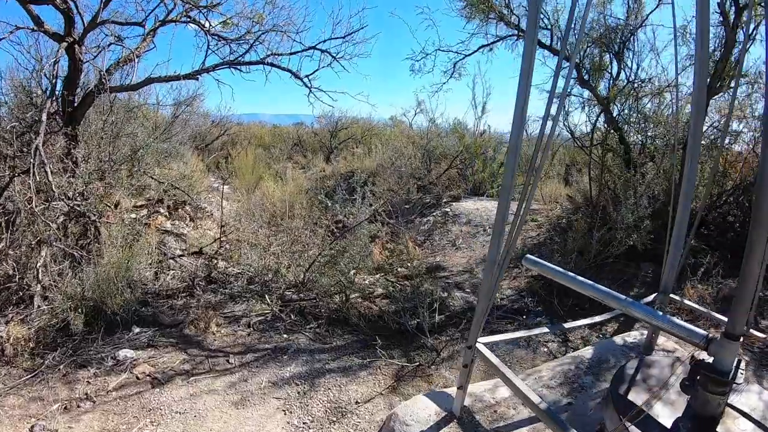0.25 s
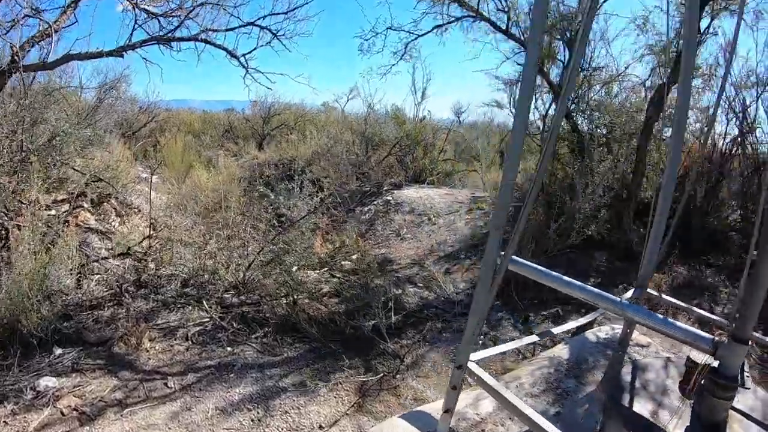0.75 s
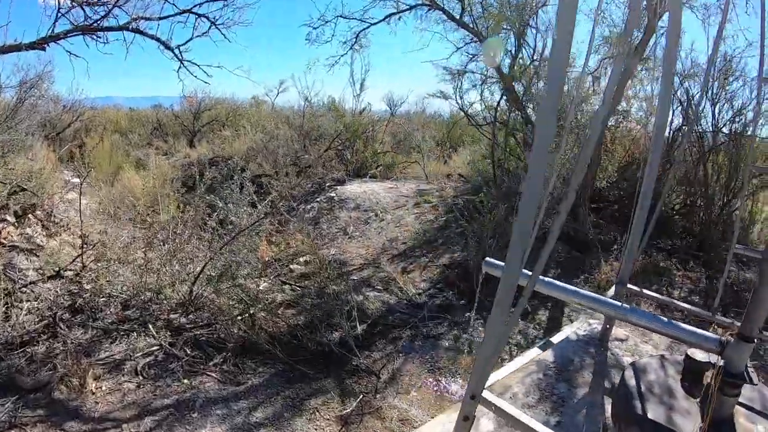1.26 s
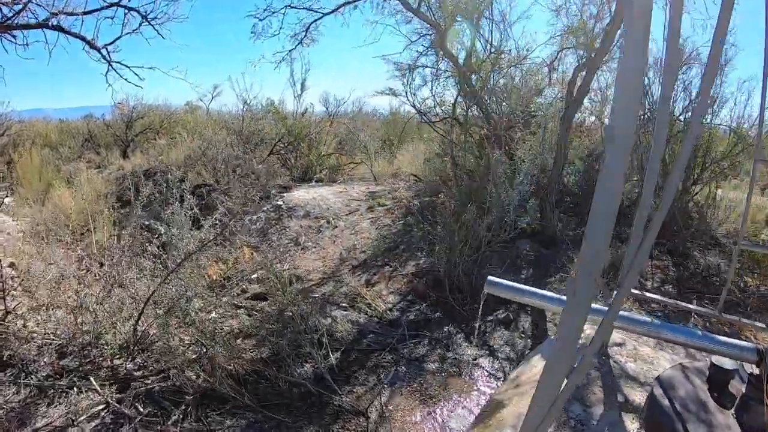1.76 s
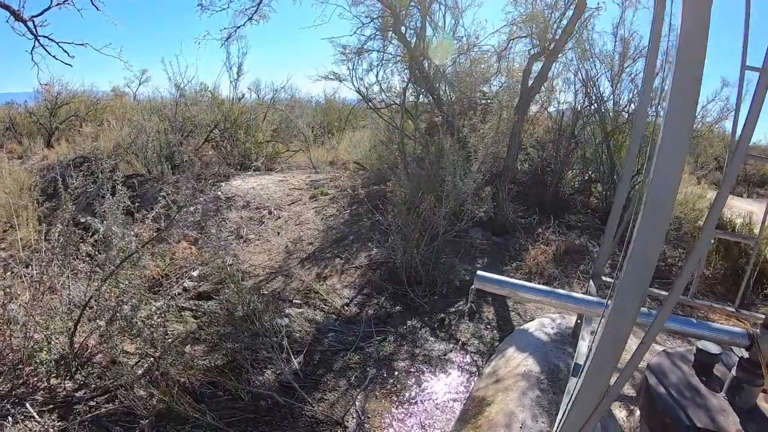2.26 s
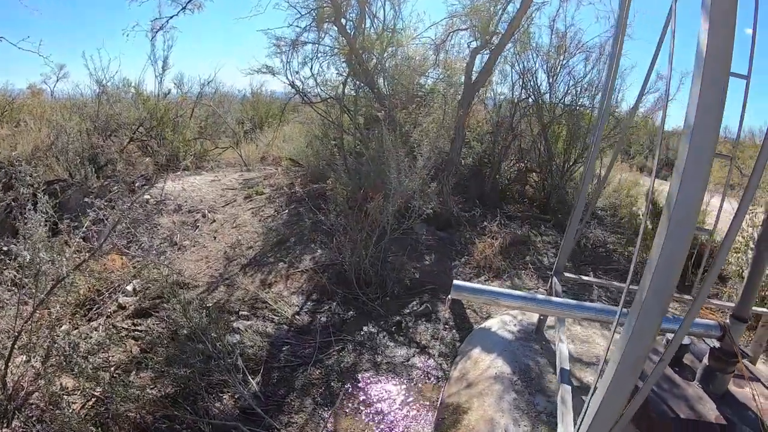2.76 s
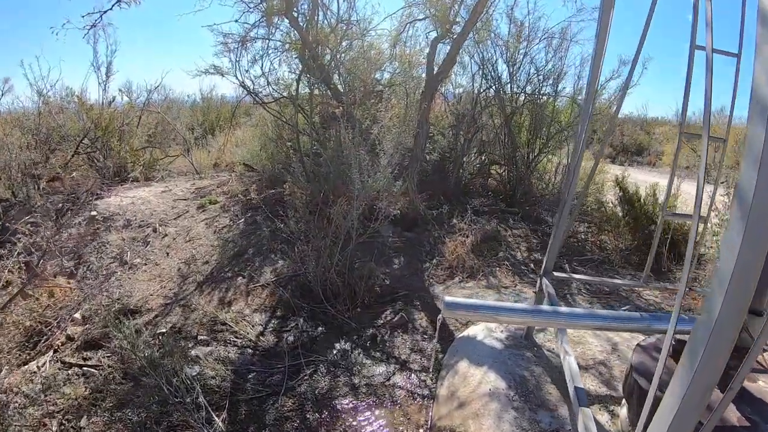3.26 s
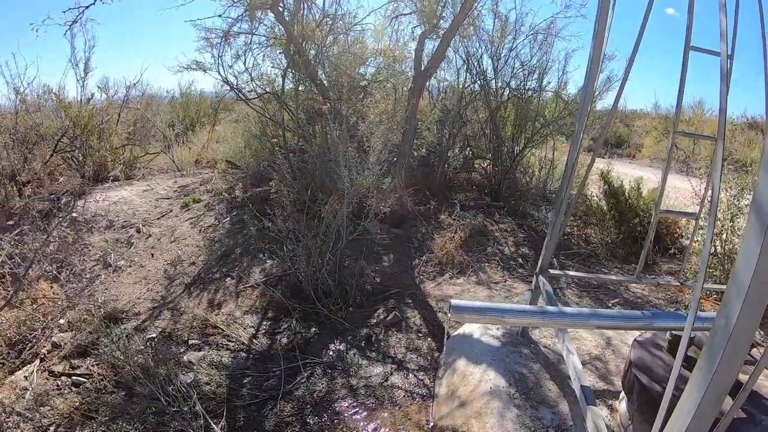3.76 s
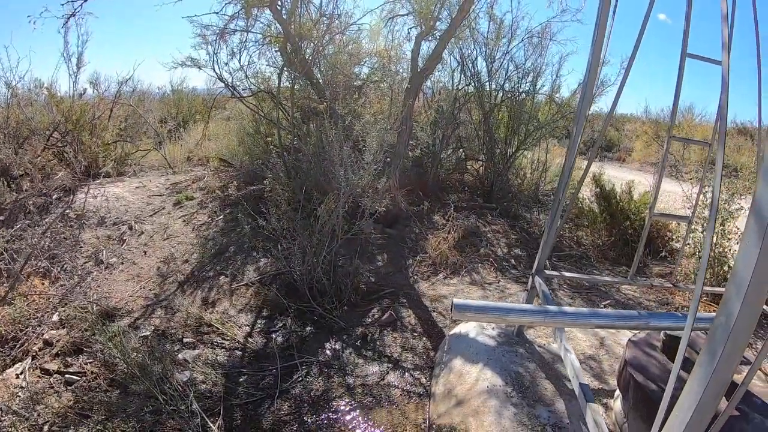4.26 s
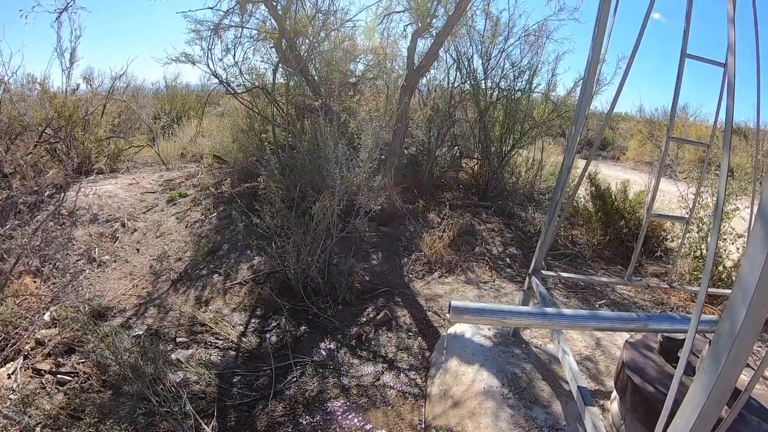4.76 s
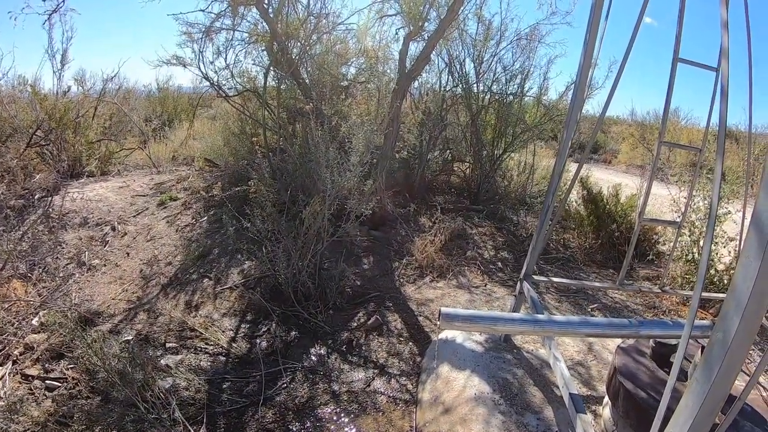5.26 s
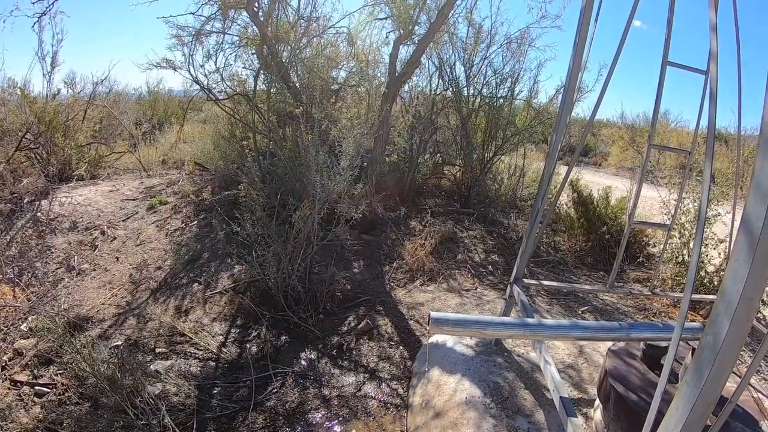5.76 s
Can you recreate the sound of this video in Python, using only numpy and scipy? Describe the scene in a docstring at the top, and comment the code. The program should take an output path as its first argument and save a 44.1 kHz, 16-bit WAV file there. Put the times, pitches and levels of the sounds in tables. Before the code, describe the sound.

At the very start a shoe scuffs briefly on gravel to the right, with a few pebble clicks, and at about 0.4 seconds there is a light knock on the hand-held microphone. At 0.6 seconds water begins to pour from a steel pump pipe, close by and slightly right. It spatters brightly on wet ground, with slapping drops, gurgles and small plops in a puddle. The flow is uneven, with a duller surge near 3.6 seconds. A low gust of wind buffets the microphone around 2.5 seconds. From about 4.3 seconds the stream weakens, and by 4.8 seconds only faint, high single drips remain, ticking on until the end at 6 seconds. More wind rumbles on the microphone from about 5.5 to 5.9 seconds. The setting is open, dry scrubland with very faint steady air and no reverberation.

```python
"""Water from one pump stroke leaves a steel pipe, spatters on wet ground, then thins to single drips.
Drops slap; trapped air rings as plops and rising plinks. Gusts buffet the two microphone ports of a
hand-held camera. Before the water, a step scuffs gravel on the right and the camera body knocks.
Open scrubland: faint steady air, no room, only scatter from ground and frame."""
import sys
import numpy as np
from scipy import signal
from scipy.fft import rfft, irfft
from scipy.io import wavfile
from scipy.ndimage import uniform_filter1d, map_coordinates

SR = 44100
rng = np.random.default_rng(int(sys.argv[2]) if len(sys.argv) > 2 else 0)


def log_audio(samples):
    """Write samples as a 16-bit WAV file to the path given in sys.argv[1]."""
    # one column per channel
    frames = np.atleast_2d(samples).T
    # limit to full scale, then quantise
    limited = np.clip(frames, -1, 1)
    pcm = np.round(limited * 32767).astype(np.int16)
    wavfile.write(sys.argv[1], SR, pcm)


N = 264864
GRAIN_SAMPLES, STRIDE_SAMPLES = 1536, 16  # one grain; one step of a level curve
PLINK_CLIMB = .45

# Spectra of spray, a drip's first contact and air pockets. Each row: frequency in Hz, density in dB.
SPRAY_SPECTRUM = [(710, -39), (1200, -12), (2140, -5.5), (2550, -6), (3120, -0.5), (4270, -1), (5330, -13),
                  (6230, -12), (7940, -15), (9190, -28), (13100, -41), (14700, -49)]
TICK_SPECTRUM = [(3000, -35), (4000, 15.5), (8500, 12), (10000, -34)]
GURGLE_SPECTRUM = [(120, -43.5), (200, -12.5), (324, -4), (673, 3), (1820, 0.5), (2600, -12), (3600, -70)]


def water():
    """The stream, its largest drops and bubbles, then the last drips."""
    # The camera turns. Each row: time in seconds, gain in dB of the treble above 6 kHz.
    facing = [(.6, 2.5), (1.8, 4), (2.4, 2.5), (3.0, 3.5), (4.7, 6)]
    out = stream() + slaps() + plops() + plinks()
    out += (gain_of(timeline(facing)) - 1) * high_pass(out, 6000)
    out += drips() + patter()
    notch_hz, width_hz = 2750, 350  # the ground echo cancels part of one band
    out -= .4 * signal.lfilter(*signal.iirpeak(notch_hz, notch_hz / width_hz, SR), out)
    return high_pass(out, 140)  # small pockets radiate no bass


def flow():
    """Spray and gurgle levels in dB: the stroke, slugs landing at once, tears in the jet."""
    # Each row: time in seconds, spray in dB, gurgle in dB.
    stroke = [(0.58, -111, -75), (0.61, -67, -75), (0.66, -46, -64), (0.77, -43.5, -55), (0.88, -50, -55),
              (1.15, -45.5, -54), (1.65, -48, -53), (2.1, -45, -53), (2.4, -45, -47), (2.56, -52, -55),
              (2.82, -51.5, -58), (3.2, -50.5, -52), (3.42, -52, -47), (3.72, -56, -56), (3.8, -47, -52),
              (4.05, -53, -54), (4.25, -56, -56), (4.38, -62, -68), (4.53, -57, -61), (4.63, -56, -61),
              (4.69, -65, -75), (5.02, -73, -92), (5.12, -94, -95)]
    # Each row: time in seconds, gurgle in dB, spray in dB.
    slugs = [(.787, -45, -48), (1.4, -50, -47), (1.565, -39, -47), (1.775, -43, -52), (2.3, -42, -49),
             (2.478, -42, -52), (2.931, -45.5, -47), (3.577, -30, -50), (3.782, -42, -48), (3.85, -44, -50),
             (4.202, -46.5, -52), (4.769, -61.5, -65)]
    # Each row: time in seconds, dip in dB.
    tears = [(3.04, -5), (3.462, -16), (4.095, -10)]
    t = np.arange(0, N, STRIDE_SAMPLES) / SR
    times_s, spray_db, gurgle_db = np.transpose(stroke)
    sprays = [np.interp(t, times_s, spray_db, left=-120)]
    gurgles = [np.interp(t, times_s, gurgle_db, left=-120)]
    for peak_s, slug_gurgle_db, slug_spray_db in slugs:
        swell_db = tent(peak_s, 0, rise_db_per_s=340, fall_db_per_s=330)
        sprays.append(swell_db + slug_spray_db)
        gurgles.append(swell_db + slug_gurgle_db)
    dips_db = sum(db * np.maximum(1 - abs(t - at_s) / .045, 0) for at_s, db in tears)
    return power_sum(db + dips_db for db in sprays), power_sum(db + dips_db for db in gurgles)


def stream():
    """The jet breaks into bunches that spray and gurgle share."""
    spray_db, gurgle_db = flow()
    clumps, flutter = drift(250), drift(350)
    return spray(spray_db, clumps, flutter) + gurgle(gurgle_db, clumps, flutter)


def spray(level_db, clumps, flutter):
    """Small drops, and a mist of droplets too fine to tell apart."""
    mist = coloured(rng.standard_normal(N), SPRAY_SPECTRUM)
    drops = shower(1394, 13000, per_s=2400, spread_db=4.8, cycles=23, clumps_db=4.4 * clumps, pitches=24)
    drops = coloured(drops, SPRAY_SPECTRUM)
    thin = np.clip((-61.5 - level_db) / 12, 0, .9)  # a failing stream leaves mostly mist
    return gain_of(level_db) * ((1 - thin) * drops + gain_of(-11 + 3.8 * flutter + 8.4 * thin) * mist)


def gurgle(level_db, clumps, flutter):
    """Air pockets ring in the puddle; a surge merges them into a duller churn."""
    clumps_db = 2.5 * clumps + 4.1 * flutter
    pockets = shower(225.7, 2530, per_s=700, spread_db=4.5, cycles=7.7, clumps_db=clumps_db, pitches=16)
    rising = shower(450, 2900, per_s=130, spread_db=3, cycles=18, clumps_db=0, pitches=12,
                    climb=PLINK_CLIMB)
    pockets = coloured(pockets, GURGLE_SPECTRUM) + gain_of(-6) * unit_rms(rising)
    weak = np.clip((-59 - level_db) / 5, 0, 1)  # a weak stream traps only small pockets
    pockets = (1 - weak) * pockets + weak * high_pass(pockets, 550)
    churn = coloured(rng.standard_normal(N), GURGLE_SPECTRUM)
    churn = unit_rms(signal.lfilter(*signal.butter(1, 700, fs=SR), churn))
    surge = np.clip((level_db + 48) / 14, .08, 1)
    return gain_of(level_db) * (np.sqrt(1 - surge) * pockets + np.sqrt(surge) * churn)


def slap(hz, noise, q, t60_s, spray_db):
    """A contact crack and a puff of noise, strongest in a band set by drop size; peak 1."""
    band = signal.iirpeak(hz, q, SR)
    ring = signal.lfilter(*band, signal.lfilter(*band, noise))
    puff = unit_rms(ring) + gain_of(spray_db) * coloured(noise, SPRAY_SPECTRUM)
    crack = gain_of(-1.5) * ping(hz, t60_s=9 / hz, rise_s=.6 / hz, climb=0)
    return unit_peak(crack + burst(puff, t60_s, rise_s=.0012))


def slaps():
    """Large drops hit the wet ground."""
    # Each row: start in seconds, level in dB, centre in Hz, wide spray in dB relative to the band.
    drops = [(0.603, -49, 3970, -23), (0.6262, -34, 3780, -2), (0.6776, -36, 3800, 18),
             (0.8243, -34, 3330, -5), (0.9087, -34.5, 2180, -2), (0.9907, -33.5, 2480, -9),
             (1.1076, -30, 2980, 0), (1.1412, -34, 3700, 5), (1.1505, -33, 3300, 0),
             (1.1645, -32, 3600, 12), (1.1685, -31, 3250, 0), (1.1815, -29, 3250, -8),
             (1.1865, -29, 3000, 0), (1.2066, -31, 3250, -9), (1.2235, -33, 3300, -3),
             (1.2717, -24, 4020, 17), (1.3117, -33, 4180, 0), (1.5013, -27, 2980, -5),
             (1.5604, -23, 4000, 11.5), (1.639, -33, 4000, -3), (1.6649, -26.5, 3130, -1),
             (1.703, -27, 3800, 12), (1.7223, -25.5, 4090, -2), (1.7691, -25.5, 3140, 11),
             (1.858, -33, 4290, 0), (1.9546, -28.5, 1950, -5), (2.03, -28, 2130, -4),
             (2.058, -26, 4380, -1), (2.0903, -29.5, 2920, -4), (2.1876, -30.5, 2360, -8),
             (2.2068, -23.5, 4240, 9), (2.2509, -29, 4290, 2.5), (2.3205, -28, 3100, 0),
             (2.4172, -31, 2020, -16), (2.4742, -28.5, 4200, 22), (2.5115, -33, 1740, -5),
             (2.5704, -32.5, 2000, -4), (2.5915, -26.5, 4330, 1), (2.632, -33, 2080, -14),
             (2.656, -25.5, 2000, 2.5), (2.7516, -31, 2200, -24), (2.8404, -33.5, 4400, -3),
             (2.873, -27.5, 1850, 0), (2.886, -33, 3300, 0), (2.9245, -28, 1730, -3), (2.933, -27, 2100, 5),
             (2.9734, -27, 4120, -7.5), (3.0223, -30.5, 2970, -1), (3.0997, -28.5, 1920, -12.5),
             (3.12, -18, 3660, -2), (3.144, -27.5, 3040, -0.5), (3.1885, -34, 3370, -5.5),
             (3.355, -28, 4800, 1), (3.4336, -30.5, 3400, 47), (3.4723, -42, 2020, -18.5),
             (3.5242, -32, 3000, 0), (3.6069, -29, 3050, -12), (3.6701, -30, 4420, 8.5),
             (3.7015, -36, 3400, 3), (3.7512, -32, 4390, -5), (3.7649, -25, 4760, 26),
             (3.805, -24, 2360, 2.5), (3.8836, -26.5, 3370, 2), (3.9068, -27, 2300, 0),
             (3.9312, -30, 2240, 8), (3.9783, -28.5, 2160, -6), (4.0035, -29.5, 3140, 16),
             (4.0293, -33, 1930, -5), (4.0445, -36, 3200, 0), (4.0622, -30, 2070, -3),
             (4.1082, -25, 4650, 4), (4.1649, -25.5, 2390, -1.5), (4.1973, -27, 3800, 5),
             (4.2525, -38, 2560, 0), (4.3166, -33.5, 3290, 10), (4.324, -37, 1900, -3),
             (4.332, -35, 2400, -3), (4.395, -41.5, 4770, -12), (4.4337, -33.5, 3430, -11),
             (4.5082, -35.5, 3910, 3), (4.5543, -33, 3100, 5), (4.571, -35, 2500, 5),
             (4.5998, -31.5, 2625, -10.5), (4.6392, -34, 2560, 6), (4.7377, -43, 7600, 1)]
    out = np.zeros(N)
    for start_s, db, hz, spray_db in drops:
        noise = rng.standard_normal(GRAIN_SAMPLES)
        add(out, start_s, gain_of(db) * slap(hz, noise, q=5.5, t60_s=.0135, spray_db=spray_db))
    return out


def plops():
    """Water smacks shut over an air pocket, which rings; large pockets ring longer."""
    # Each row: start in seconds, level in dB, pitch in Hz.
    pockets = [(0.711, -30.5, 1690), (0.727, -33, 1800), (0.742, -34, 1350), (0.773, -33.5, 1110),
               (0.789, -30, 1300), (1.051, -36, 800), (1.125, -32.5, 730), (1.311, -34.5, 566),
               (1.344, -33, 1950), (1.395, -38, 781), (1.567, -29, 1100), (1.595, -27.5, 890),
               (1.605, -29, 1000), (1.678, -29.5, 1430), (1.917, -36.5, 604), (2.148, -35.5, 505),
               (2.208, -33, 630), (2.257, -30, 670), (2.291, -33, 603), (2.328, -25.5, 1074),
               (2.415, -34, 1250), (2.586, -35, 625), (2.619, -39.5, 338), (2.722, -36.5, 890),
               (2.753, -35.5, 1310), (2.925, -30, 844), (2.999, -33.5, 724), (3.062, -34, 960),
               (3.18, -32, 450), (3.204, -37.5, 530), (3.229, -31.5, 724), (3.298, -35, 900),
               (3.356, -31, 600), (3.399, -31, 1280), (3.619, -37, 286), (3.741, -29.5, 930),
               (3.848, -28.5, 980), (3.95, -37.5, 880), (3.978, -26, 1310), (4.005, -31.5, 1160),
               (4.146, -35.5, 433), (4.165, -33, 1280), (4.194, -38, 725), (4.211, -34, 750),
               (4.22, -38, 900), (4.316, -37, 1460), (4.501, -38.5, 1330), (4.538, -39, 900),
               (4.615, -35, 1175), (4.773, -50, 700), (5.493, -68, 2200)]
    out = np.zeros(N)
    for start_s, db, hz in pockets:
        noise = coloured(rng.standard_normal(GRAIN_SAMPLES), GURGLE_SPECTRUM)
        smack = gain_of(-5.5) * burst(noise, t60_s=.013, rise_s=.0008)
        ring = ping(hz, t60_s=.015 + 2.3 / hz, rise_s=.68 / hz, climb=.066)
        add(out, start_s, gain_of(db) * (ring + smack))
    return out


def plinks():
    """Bubbles ring on, climbing in pitch as they near the surface."""
    # Each row: start in seconds, level in dB, starting pitch in Hz, t60 in seconds.
    bubbles = [(1.355, -40, 1550, .035), (1.366, -37, 1500, .025), (2.698, -45, 350, .05),
               (2.799, -41, 370, .065), (2.974, -36, 440, .032), (3.161, -43, 400, .045),
               (3.309, -35, 1150, .028), (3.415, -33, 1120, .022)]
    out = np.zeros(N)
    for start_s, db, hz, t60_s in bubbles:
        add(out, start_s, gain_of(db) * ping(hz, t60_s, rise_s=t60_s / 12, climb=PLINK_CLIMB))
    return out


def drips():
    """Drips from the pipe lip tick and ring; what they throw up spatters down again."""
    # Each row: start in seconds, level in dB, pitch in Hz, tick in dB relative to the ring.
    drops = [(4.7739, -48, 7440, -30), (4.7938, -50, 4730, 3), (4.8095, -49, 5150, -2),
             (4.911, -51, 6380, 4), (5.2038, -46, 4330, -20), (5.228, -48, 4440, -22),
             (5.298, -54, 7920, -7), (5.3238, -50.5, 4570, -7), (5.4729, -43, 4300, -4.5),
             (5.7417, -45.5, 4360, -7), (5.9497, -52, 4370, -7.5)]
    out = np.zeros(N)
    for start_s, db, hz, tick_db in drops:
        noise = rng.standard_normal(GRAIN_SAMPLES)
        tick = gain_of(tick_db) * burst(coloured(noise, TICK_SPECTRUM), t60_s=.015, rise_s=.00075)
        ring = ping(hz, t60_s=.0061, rise_s=.00078, climb=.04)
        spatter = gain_of(-24) * slap(hz, noise[::-1], q=3, t60_s=.11, spray_db=-20)
        add(out, start_s, gain_of(db) * (ring + tick + spatter))
    return out


def patter():
    """Faint droplets between the last drips."""
    # Each row: time in seconds, level in dB.
    levels = [(4.6, -100), (4.75, -79), (5.1, -90), (6, -90)]
    droplets = shower(3000, 8500, per_s=90, spread_db=4, cycles=25, clumps_db=3 * drift(900), pitches=6)
    return gain_of(timeline(levels, before=-120)) * coloured(droplets, TICK_SPECTRUM)


def wind():
    """Low turbulence, unrelated at the two ports; each gust swells and dies."""
    # Each row: peak time in seconds, level in dB, left minus right in dB, seconds to rise 20 dB,
    # seconds to fall 20 dB.
    gusts = [(.8, -58, -9, .04, .09), (1.56, -61, -2, .05, .13), (1.8, -56, 12, .08, .09),
             (2.33, -60, 9, .15, .2), (2.45, -41.5, 3, .12, .16), (3.56, -56, 2, .08, .15),
             (3.64, -60, -4, .15, .05), (3.87, -60, 11, .05, .055), (5.32, -64, 8, .012, .03),
             (5.372, -62, 10, .03, .08), (5.54, -62, -11, .04, .04), (5.61, -46, 6, .015, .2),
             (5.675, -41, 8, .06, .2), (5.77, -45, -8, .15, .05), (5.845, -43, 0, .12, .08),
             (5.92, -59, 8, .05, .15)]
    # Each row: frequency in Hz, density in dB.
    spectrum = [(12, -70), (20, -13), (76, -4), (130, -0.5), (184, -5), (295, -22), (700, -55),
                (1100, -100)]
    rumble = np.sqrt(2) * coloured(rng.standard_normal((2, N)), spectrum)
    levels_db = [tent(peak_s, db, 20 / rise_s, 20 / fall_s) + np.array([[pan_db / 2], [-pan_db / 2]])
                 for peak_s, db, pan_db, rise_s, fall_s in gusts]
    return gain_of(power_sum(levels_db)) * rumble


def step():
    """Gravel grinds under a shoe, pebbles click, loose stones settle."""
    # Each row: start in seconds, length in seconds, level in dB.
    scuffs = [(-.004, .124, -48), (.372, .006, -52)]
    # Each row: start in seconds, level in dB, pitch in Hz.
    pebbles = [(.028, -41, 330), (.0345, -33, 900), (.042, -36, 620), (.071, -35, 520), (.0765, -31.5, 680),
               (.103, -37, 1500), (.111, -37, 596), (.293, -51, 840)]
    # Each row: frequency in Hz, density in dB.
    spectrum = [(88, -54), (150, -25), (675, -10), (841, -6.5), (3030, -17.5), (4710, -29.5), (8170, -21.5),
                (12000, -94)]
    # Each row: frequency in Hz, left minus right in dB.
    balance = [(500, -4.5), (700, -2.5), (1000, -28.5), (3000, -22.5), (4500, -16), (9000, -8)]
    t = np.arange(0, N, STRIDE_SAMPLES) / SR
    levels_db = [tent(.64, -76, rise_db_per_s=0, fall_db_per_s=400)]  # settling
    for start_s, length_s, db in scuffs:
        lifted_s = t - start_s - length_s
        release_db = np.where(lifted_s > 0, -3 - 310 * lifted_s, 0)
        levels_db.append(tent(start_s, db, rise_db_per_s=2500, fall_db_per_s=5) + release_db)
    grind = shower(200, 12000, per_s=8000, spread_db=2, cycles=8, clumps_db=2 * drift(300), pitches=12)
    out = gain_of(power_sum(levels_db)) * coloured(grind, spectrum)
    for start_s, db, hz in pebbles:
        noise = coloured(rng.standard_normal(GRAIN_SAMPLES), GURGLE_SPECTRUM)
        click = gain_of(-6) * burst(noise, t60_s=.008, rise_s=.0004)
        ring = ping(hz, t60_s=13 / hz, rise_s=.001, climb=.017)
        add(out, start_s, gain_of(db) * (ring + click))
    return ports(high_pass(out, 150), balance, wander_s=40e-6)


def knock():
    """A tap rings the camera body, rattles loose parts and shakes the ports in opposite directions."""
    # Each row: frequency in Hz, relative level in dB, t60 in seconds.
    modes = [(280, -4.5, 0.036), (760, -16.5, 0.036), (1720, -3, 0.016), (2020, -3, 0.012)]
    t, out = np.arange(4000) / SR, np.zeros(N)
    ring = sum(gain_of(db - 60 * t / t60_s) * np.sin(2 * np.pi * hz * t) for hz, db, t60_s in modes)
    rattle = gain_of(-29 - 60 * t / .18) * coloured(rng.standard_normal(len(t)), GURGLE_SPECTRUM)
    click = gain_of(-36 - 60 * t / .06) * coloured(rng.standard_normal(len(t)), TICK_SPECTRUM)
    attack = 1 - np.exp(-t / .0029)
    add(out, start_s=.369, sound=unit_peak((ring + rattle + click) * attack))
    return out * np.array([[-gain_of(-20.5)], [gain_of(-16)]])


def air():
    """Faint steady noise of the open land, partly common to both ports."""
    # Each row: frequency in Hz, density in dB.
    spectrum = [(18, -97), (30, -42), (150, 3), (233, -6), (302, -17), (506, -29), (829, 1), (944, -8.5),
                (1950, -26), (3830, -23), (7910, -22.5), (10300, -30.5), (14700, -60)]
    common, left, right = rng.standard_normal((3, N))
    return gain_of(-78.5) * coloured(np.array([left, right]) + .21 * common, spectrum)


def scatter(x, t60_s):
    """Sparse echoes off ground, concrete and steel frame, separate for each port."""
    taps = np.zeros((2, 4400))
    delays = np.arange(60, 4380, 20) + rng.integers(0, 20, (2, 216))
    np.put_along_axis(taps, delays, rng.choice([-1., 1.], delays.shape), 1)
    taps *= gain_of(-60 * np.arange(4400) / SR / t60_s)
    return signal.oaconvolve(x[None], taps / np.linalg.norm(taps[0]), axes=1)[:, :N]


def ports(x, balance, wander_s):
    """The camera body shades each port differently; grains land apart, so the left delay wanders."""
    # Each row: frequency in Hz, lead of the left port in radians.
    phase = [(260, -.1), (700, -.6), (1000, -.2), (1700, .4), (3000, 0), (4800, -.2), (5600, -1.6),
             (7200, -1.3)]
    hz = np.fft.rfftfreq(N, 1 / SR)
    half = gain_of(log_interp(balance, hz) / 2) * np.exp(.5j * log_interp(phase, hz))
    pair = np.array([half, 1 / half])
    left, right = irfft(rfft(x) * pair / abs(pair.mean(0)), N)
    positions = np.arange(N) + wander_s * SR * drift(400)
    return np.array([map_coordinates(left, [positions], order=3), right])


def shower(low_hz, high_hz, per_s, spread_db, cycles, clumps_db, pitches, climb=.16):
    """Random pings, many faint and a few loud, bunched in level by the curve clumps_db."""
    sizes = gain_of(spread_db * np.minimum(rng.exponential(1, N), 3))
    hits = sizes * (rng.random(N) < per_s / SR)
    hits *= gain_of(clumps_db) * rng.choice([-1., 1.], N)
    pitch_index = rng.integers(0, pitches, N)
    out = np.zeros(N)
    for k, hz in enumerate(np.geomspace(low_hz, high_hz, pitches)):
        ring = np.sqrt(hz) * ping(hz, t60_s=cycles / hz, rise_s=.96 / hz, climb=climb)
        out += signal.oaconvolve(hits * (pitch_index == k), ring)[:N]
    return out


def ping(hz, t60_s, rise_s, climb):
    """A sine burst whose pitch gains 2 * climb * hz per t60_s."""
    t = np.arange(GRAIN_SAMPLES) / SR
    return burst(np.sin(2 * np.pi * hz * (t + climb * t ** 2 / t60_s)), t60_s, rise_s)


def burst(carrier, t60_s, rise_s):
    """Quick swell, exponential decay; peak 1."""
    t = np.arange(GRAIN_SAMPLES) / SR
    return unit_peak(carrier * gain_of(-60 * t / t60_s) * (1 - np.exp(-(t / rise_s) ** 2)))


def drift(samples):
    """Smoothed noise; rms 1."""
    return unit_rms(uniform_filter1d(uniform_filter1d(rng.standard_normal(N), samples), samples))


def tent(peak_s, db, rise_db_per_s, fall_db_per_s):
    """A level in dB that climbs and falls, one value per stride."""
    t = np.arange(0, N, STRIDE_SAMPLES) / SR - peak_s
    return db + np.where(t < 0, rise_db_per_s * t, -fall_db_per_s * t)


def power_sum(levels_db):
    """Adds strided levels as powers; dB per sample."""
    total_db = 10 * np.log10(sum(gain_of(db) ** 2 for db in levels_db) + 1e-20)
    return np.repeat(total_db, STRIDE_SAMPLES, axis=-1)[..., :N]


def timeline(points, before=None):
    """Interpolates (seconds, value) rows at every sample."""
    return np.interp(np.arange(N) / SR, *np.transpose(points), left=before)


def log_interp(points, hz):
    """Interpolates (Hz, value) rows on a log-frequency axis."""
    points_hz, values = np.transpose(points)
    return np.interp(np.log(hz + 1), np.log(points_hz + 1), values)


def coloured(x, spectrum):
    """Filters x by (Hz, dB) rows; rms 1."""
    hz = np.fft.rfftfreq(x.shape[-1], 1 / SR)
    return unit_rms(irfft(rfft(x) * gain_of(log_interp(spectrum, hz)), x.shape[-1]))


def high_pass(x, hz):
    return signal.sosfilt(signal.butter(2, hz, "high", fs=SR, output="sos"), x)


def gain_of(db):
    return 10 ** (np.asarray(db) / 20)


def unit_rms(x):
    return x / np.sqrt(np.mean(x ** 2) + 1e-20)


def unit_peak(x):
    return x / abs(x).max()


def add(mix, start_s, sound):
    part = mix[round(start_s * SR):][:len(sound)]
    part += sound[:len(part)]


def scene():
    """Water and step to the right of the camera, wind and hand on its body."""
    # Sound from the pipe. Each row: frequency in Hz, left minus right in dB.
    balance = [(300, 0.5), (520, -2.5), (700, -6.5), (1200, -18), (1500, -14), (2100, -5), (3000, -7),
               (4500, -6.5), (5600, -0.5), (7200, -2), (12000, -9)]
    splash = water()
    echoes = gain_of([[-17], [-15]]) * scatter(splash, t60_s=.041)
    return ports(splash, balance, wander_s=20e-6) + echoes + wind() + step() + knock() + air()


def record(dry):
    """Microphone bass roll-off at 40 Hz, band limit at 14.9 kHz."""
    band_limit = signal.firwin(511, 14900, window=("kaiser", 9), fs=SR)
    return signal.oaconvolve(high_pass(dry, 40), band_limit[None], "same")


dry = scene()
out = record(dry)
log_audio(out)
```